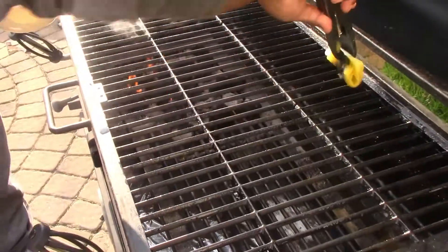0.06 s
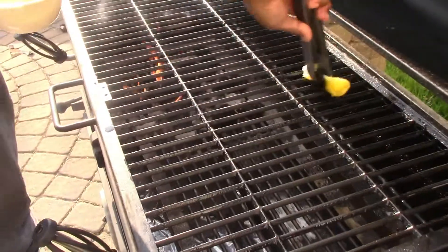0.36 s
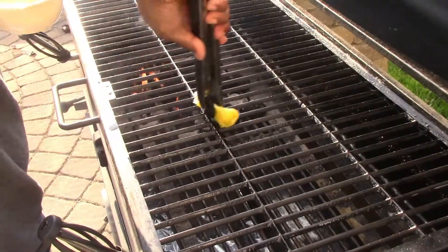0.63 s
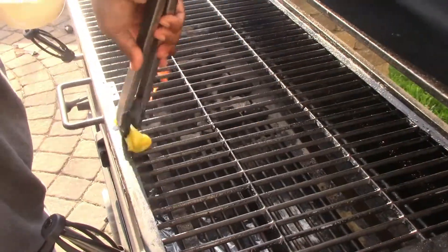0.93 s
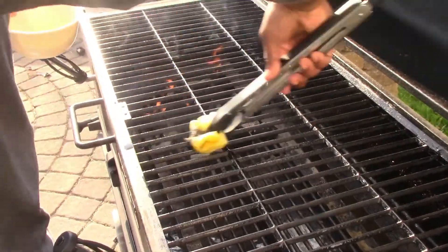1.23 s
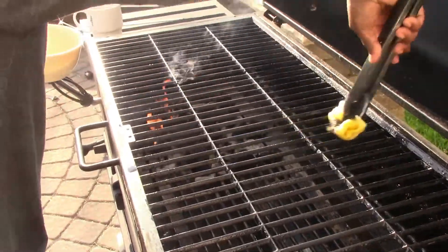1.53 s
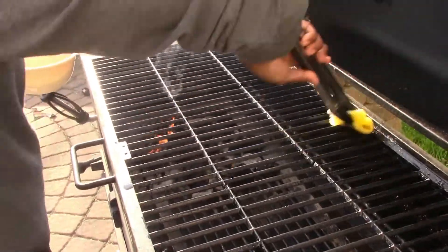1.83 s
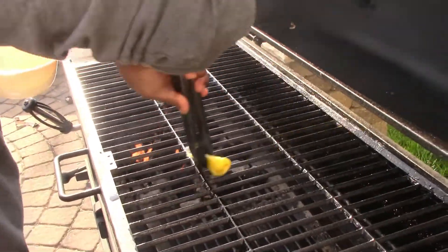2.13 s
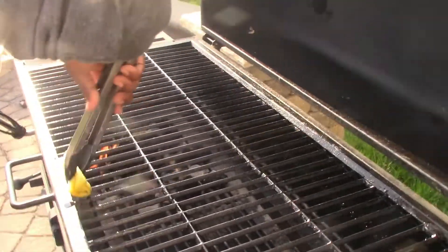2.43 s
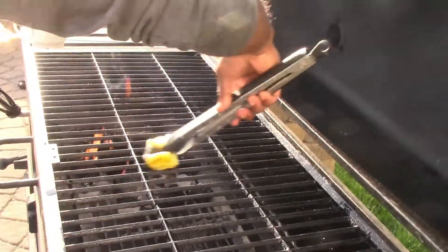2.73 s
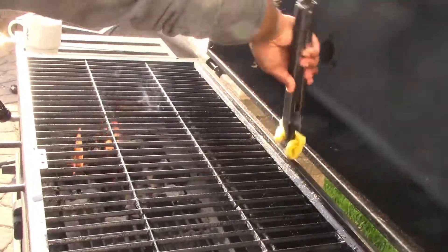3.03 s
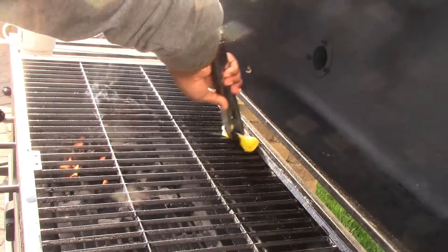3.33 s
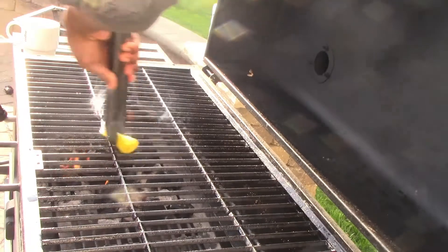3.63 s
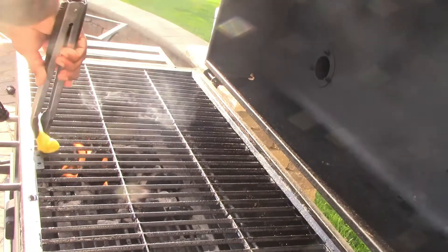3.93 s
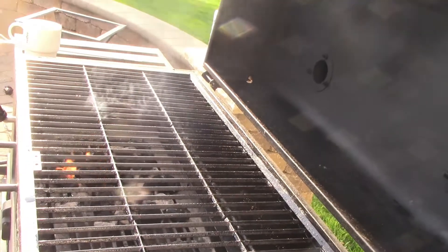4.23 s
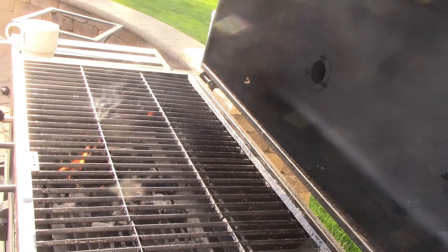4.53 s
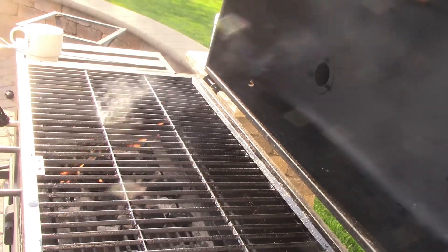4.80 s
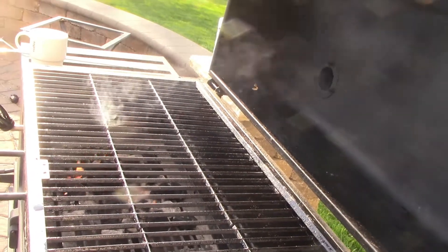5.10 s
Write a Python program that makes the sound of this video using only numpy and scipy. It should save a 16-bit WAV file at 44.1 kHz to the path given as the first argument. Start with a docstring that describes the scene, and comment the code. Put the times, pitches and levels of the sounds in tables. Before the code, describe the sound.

Outdoors, gas flames roar softly under a grill as metal tongs give a brief creak, then clack sharply and drag along the grate. The bars ring dully, and a paper towel rubs and sizzles back and forth on the hot steel. Low wind gusts buffet the microphone, strongest near the middle. After the last clack come two very faint steam whistles and a quiet, gritty shoe scuff.

```python
"""Steel tongs clack and scrape on the bars of a lit outdoor gas grill as they push a wad of paper towel.
Each hit makes the grate ring on dully. The towel hisses over the hot steel, the grip creaks,
and steam whistles faintly out of the fat. Behind it the flames roar softly and gusts of wind
buffet the microphone. At the end a shoe scuffs on the gritty paving."""
import sys
import numpy as np
from scipy import signal
from scipy.fft import rfft, irfft, next_fast_len
from scipy.io import wavfile

SR = 44100
rng = np.random.default_rng(int(sys.argv[2]) if len(sys.argv) > 2 else 0)


def unload_audio(sound):
    """Save the sound as a 16-bit wav file, at the path given as the first command line argument."""
    columns = np.transpose(np.atleast_2d(sound))
    # keep every value between -1 and 1, then stretch to whole-number steps
    steps = np.round(np.clip(columns, -1, 1) * 32767)
    wavfile.write(sys.argv[1], SR, steps.astype(np.int16))


N = 236318
RING_TIME = np.arange(32768) / SR  # seconds since a hit

# the tone of steel meeting steel: (frequency [Hz], level [dB])
CONTACT_TONE = [(100, -51), (600, 1), (1400, 5), (3400, -0.5), (4300, 6.5), (6000, 1), (8800, -6),
                (11800, -13), (14000, -30), (16000, -47)]


def amp(db):
    """Turns decibels into a gain."""
    return 10 ** (np.asarray(db) / 20)


def unit_rms(x):
    """Scales a sound to an average power of 1."""
    return x / np.sqrt(np.mean(x ** 2) + 1e-20)


def unit_energy(x):
    """Scales a sound to an energy of 1 per channel, however long it is."""
    return unit_rms(x) / np.sqrt(x.shape[-1])


def curve(points, hz):
    """Reads a curve through (frequency, value) points, spaced by octaves."""
    point_hz, value = np.transpose(points)
    return np.interp(np.log(hz + 1), np.log(point_hz + 1), value)


def bins(size):
    """The frequencies in the spectrum of a sound of this size."""
    return np.fft.rfftfreq(size, 1 / SR)


def add(mix, start, sound):
    """Mixes a sound in at a start time in seconds."""
    part = mix[:, max(round(start * SR), 0):][:, :sound.shape[-1]]
    part += sound[..., :part.shape[1]]


def colour(x, tone):
    """Shapes a sound with a (frequency [Hz], level [dB]) curve."""
    size = next_fast_len(x.shape[-1])
    return irfft(rfft(x, size) * amp(curve(tone, bins(size))), size)[..., :x.shape[-1]]


def tilted(x, slope_db, corner_hz=2500):
    """Brightens or dulls the treble by slope_db an octave."""
    size = next_fast_len(x.shape[-1] + 512)
    octaves = np.log2(1 + (bins(size) / corner_hz) ** 2) / 2
    return irfft(rfft(x, size) * amp(slope_db * octaves), size)[..., :x.shape[-1]]


def band(x, low_hz, high_hz):
    """Keeps what lies between two frequencies."""
    high_hz = min(high_hz, SR / 3)
    low_hz = min(low_hz, high_hz * .9)
    return signal.sosfilt(signal.butter(4, [low_hz, high_hz], "band", fs=SR, output="sos"), x)


def stereo_noise(size):
    """White noise that is nearly the same on the left and on the right."""
    # how alike the two sides are: (frequency [Hz], likeness [0 to 1])
    likeness = [(30, 1), (150, 1), (300, 0.99), (600, 0.98), (1200, 0.97), (2200, 0.96), (4000, 0.9),
                (16000, 1)]
    padded = next_fast_len(size)
    a, b = rfft(rng.standard_normal((2, padded)))
    same = np.clip(curve(likeness, bins(padded)), 0, 1)
    mid, side = a * np.sqrt((1 + same) / 2), b * np.sqrt((1 - same) / 2)
    return irfft(np.array([mid + side, mid - side]), padded)[:, :size]


def drift(rate_hz, size):
    """A value that wanders at random, turning rate_hz times a second."""
    points = rng.standard_normal(4096)
    return unit_rms(np.interp(np.arange(size) / SR * rate_hz, np.arange(len(points)), points))


def grains(size, per_s, spread_db):
    """Random clicks, a few of them large."""
    heights = amp(spread_db * np.minimum(rng.exponential(1, size), 4)) * rng.choice([-1, 1], size)
    return unit_rms(heights * (rng.random(size) < per_s / SR))


def swell(start, hold, rise_s, fall_s):
    """A gain that grows to 1 at start, holds and dies away."""
    t = np.arange(N) / SR - start
    return np.exp(np.minimum(t, 0) / rise_s - np.maximum(t - hold, 0) / fall_s)


def ringing(notes, t, scatter_db=0, stretch=1):
    """The fading notes of struck metal; scatter_db varies their levels, stretch makes them last longer."""
    chance = rng.standard_normal((len(notes), 2))
    sound = np.zeros(len(t))
    for (hz, db, ring_s), (luck, phase) in zip(notes, chance):
        fade = amp(db + scatter_db * luck - 60 * t / (ring_s * stretch))
        sound += fade * np.sin(2 * np.pi * hz * t + np.pi * phase)
    return unit_energy(sound)


def burner(level_db=-48):
    """The gas flames roar softly, with a slight flicker."""
    # the tone of the flames and the open air: (frequency [Hz], level [dB])
    flame_tone = [(20, -26), (70, -1.5), (170, 3), (300, 2), (550, -3), (900, -3), (1500, -11),
                  (2200, -15.5), (3500, -17.5), (6000, -24.5), (8000, -43), (11000, -63), (15500, -39)]
    flicker = amp(.5 * drift(25, N))
    return amp(level_db) * flicker * unit_rms(colour(stereo_noise(N), flame_tone))


def wind_strength(breeze_db=-57, shake_db=2, shake_hz=45.06):
    """Gusts add to a light breeze, and swirling air makes the level shake."""
    # gusts of wind: (time [s], hold [s], level [dB], fade time [s])
    gust_list = [(0.01, 0.025, -36.5, 0.036), (0.644, 0.028, -22.5, 0.057), (0.791, 0.0072, -26, 0.0081),
                 (0.854, 0.004, -29, 0.013), (0.923, 0.023, -38, 0.02), (1.14, 0.4, -40.5, 0.03),
                 (1.528, 0.08, -17.5, 0.1), (1.705, 0.024, -18, 0.027), (1.872, 0.006, -25.5, 0.014),
                 (1.961, 0.0054, -25, 0.016), (2.036, 0.017, -19, 0.047), (2.104, 0.01, -29, 0.12),
                 (4.258, 0.16, -43, 0.023)]
    gusts = [amp(db) * swell(start, hold, rise_s=0.024, fall_s=fade) for start, hold, db, fade in gust_list]
    power = amp(breeze_db) ** 2 + np.sum(np.square(gusts), 0)
    return np.sqrt(power) * amp(shake_db * drift(shake_hz, N))


def wind(lean_left_db=2.16, roar_db=-11, crossover=0.21):
    """Big swirls of air thump each side of the microphone separately; strong gusts add a higher roar."""
    # the tone of wind on the microphone: (frequency [Hz], level [dB])
    buffet_tone = [(20, -33), (50, -21.5), (90, -2), (140, 2), (210, 0), (320, -11), (480, -23),
                   (700, -35.5), (1200, -55), (3000, -67)]
    strength = wind_strength()
    big_swirls, small_swirls = colour(rng.standard_normal((2, 2, N)), buffet_tone)
    roar = unit_rms(band(small_swirls + crossover * small_swirls[::-1], 300, 2000))
    roar_share = np.clip((strength / amp(roar_db)) ** 0.85, 0, .8)  # grows as the wind nears roar_db
    rumble = unit_rms(big_swirls) * np.sqrt(1 - roar_share ** 2)
    return strength * (rumble + roar * roar_share) * amp([[lean_left_db], [-lean_left_db]])


def shoe_scuffs(spill_db=-15):
    """A sole grinds sand against the paving; some of the crunch spills over all pitches."""
    # slides of the shoe: (time [s], length [s], level [dB], low edge [Hz], high edge [Hz])
    slides = [(4.756, 0.11, -57, 4200, 10600), (4.775, 0.077, -43.5, 200, 3080),
              (4.827, 0.053, -52, 5100, 10200), (4.834, 0.072, -41, 475, 2760),
              (4.885, 0.21, -49, 665, 3300), (4.942, 0.25, -68, 4800, 10700), (5.04, 0.12, -45, 750, 3180),
              (5.28, 0.064, -53.5, 5450, 9500)]
    out = np.zeros((2, N))
    for start, length, db, low_hz, high_hz in slides:
        size = int(length * SR)
        grind = stereo_noise(SR // 2) + grains(SR // 2, per_s=700, spread_db=5.0)
        crunch = unit_rms(band(grind, low_hz, high_hz))
        crunch += amp(spill_db) * unit_rms(colour(grind, CONTACT_TONE))
        add(out, start, amp(db) * unit_rms(crunch[:, :size] * signal.windows.tukey(size, .7)))
    return out


def creaks(width=1.24, body_db=-10):
    """Dry surfaces stick and slip: each slip is a short tick with a duller body an octave below."""
    # ticks of the grip, later of grit under the shoe: (time [s], length [s], energy [dB], pitch [Hz])
    ticks = [(0.1856, 0.005, -6.5, 2170), (.29, 0.0024, -4, 2230), (0.293, 0.0028, 0, 2240),
             (.3015, 0.0013, -14, 2300), (0.306, 0.0014, -2, 2230), (0.312, 0.00089, -14, 2680),
             (4.786, 0.0023, -19, 1710), (4.872, 0.0023, -18, 6350), (4.987, 0.00099, -25.5, 7800),
             (5.002, 0.0028, -17, 1590), (5.056, 0.0014, -11, 2350), (5.057, 0.00065, -18.5, 5660),
             (5.097, .001, -17, 1890), (5.136, 0.0012, -17, 1770)]
    out, t = np.zeros((2, N)), RING_TIME[:2048]
    for start, length, db, hz in ticks:
        fade = np.exp(-(t / length) ** 4) + .1 * np.exp(-t / .011)
        burst = rng.standard_normal(len(t)) * fade
        tick = unit_energy(band(burst, hz / width, hz * width))
        body = unit_energy(band(burst, hz / 2 / width, hz / 2 * width))
        add(out, start, amp(db) * unit_energy(tick + amp(body_db) * body))
    return out


def fat_whistles(waver=.002):
    """Steam whistles out of a drop of fat through a tiny hole."""
    # thin whistles: (time [s], length [s], level [dB], pitch [Hz])
    whistles = [(3.82, 0.061, -63.5, 7000), (4.067, 0.086, -71, 7640)]
    out = np.zeros((2, N))
    for start, length, db, hz in whistles:
        size = int(length * SR)
        cycles = np.cumsum(hz * (1 + waver * drift(300, size))) / SR
        add(out, start, amp(db) * unit_rms(np.sin(2 * np.pi * cycles) * np.hanning(size)))
    return out


def firebox_bands():
    """The grate and the box under it ring with countless notes: gives each band's tone, rise and fall."""
    # bands of that blurred ring: (frequency [Hz], level [dB], time to fade 60 dB [s], rise time [s])
    ring_bands = [(65.5, -24, 1, 0.0098), (182, 0, 1, 0.011), (330, -4.5, 0.62, 0.0082),
                  (560, -4.5, 0.44, 0.0093), (950, -10.5, 0.28, 0.014), (1740, -14.5, 0.27, 0.0035),
                  (2680, -4, 0.072, 0.00033), (4840, -21, 0.15, 0.0019), (7740, -23.5, 0.11, 0.0021),
                  (13900, -51, 0.083, 0.0011)]
    hz, db, ring_s, rise_s = np.transpose(ring_bands)
    freqs = bins(len(RING_TIME))
    bass_cut = np.minimum(freqs / hz[0], 1)
    tone = amp(curve(np.c_[hz, db], freqs)) * bass_cut
    shares = np.array([curve(np.c_[hz, row], freqs) for row in np.eye(len(hz))])
    rise = 1 - np.exp(-RING_TIME / rise_s[:, None])
    fall_db = -60 * RING_TIME / ring_s[:, None]
    return shares * tone, rise, fall_db


def grate_ring(bands, stretch=1, notes_db=-2, rise_s=0.012):
    """Grate and box ring after one hit; a stretch below 1 cuts it short, as tongs resting on them do."""
    # the grate's clearest notes: (pitch [Hz], level [dB], time to fade 60 dB at stretch 1 [s])
    grate_notes = [(154.5, 4, 0.63), (197, -1, 1), (279.2, 4, 1), (310.3, -4.5, 1), (325.3, 4, 0.57),
                   (422, -18, 0.96), (455.3, 1.5, 0.51), (561, -24, 0.59), (634, -7, 0.34), (655, 0, 0.49),
                   (777, -2, 0.57), (963, -0.5, 0.29), (1064, -8.5, 0.51), (1190, -4, 0.33),
                   (2100, -3, 0.236), (2700, -2, 0.25)]
    tones, rise, fall_db = bands
    noise_bands = irfft(rfft(stereo_noise(len(RING_TIME)))[:, None] * tones)
    blur = (noise_bands * rise * amp(fall_db / stretch)).sum(1)
    notes = ringing(grate_notes, RING_TIME, scatter_db=4.5, stretch=stretch)
    notes *= 1 - np.exp(-RING_TIME / rise_s)
    return unit_energy(unit_energy(blur) + amp(notes_db) * notes)


def towel_pressure(press_s=0.12, lift_s=0.082, ease_db_per_s=3.5, sizzle_db=-55):
    """The hand presses the towel on, eases off and lifts it; the oiled bars sizzle on by themselves."""
    # strokes to and fro along the bars: (time [s], length [s], starting level [dB])
    strokes = [(0.22, 0.6, -42), (1.103, 0.39, -46), (1.77, 0.33, -42.5), (2.528, 0.27, -45.5),
               (3.245, 0.58, -46.5)]
    t = np.arange(N) / SR
    power = np.full(N, amp(sizzle_db) ** 2)
    for start, length, db in strokes:
        easing = amp(db - ease_db_per_s * np.clip(t - start, 0, length))
        power += (easing * swell(start, length, press_s, lift_s)) ** 2
    return np.sqrt(power)


def towel(bands, fibres_db=-5, flutter_db=2.2, hum_db=-2):
    """Paper fibres catch and sizzle on hot steel, and the rubbing keeps the grate humming."""
    # the tone of paper rubbing on steel: (frequency [Hz], level [dB])
    paper_tone = [(60, -15), (180, 24), (500, 0), (1000, 5), (2600, 1), (4200, -1), (8000, -3.5),
                  (11000, -10), (15500, -21)]
    rub = unit_rms(stereo_noise(N) + amp(fibres_db) * grains(N, per_s=1400, spread_db=2))
    pressure = towel_pressure() * amp(flutter_db * drift(60, N))
    hiss = pressure * unit_rms(colour(rub, paper_tone))
    shaking = pressure * rng.standard_normal(N)
    hum = signal.fftconvolve(shaking[None], grate_ring(bands), axes=1)[:, :N]
    return hiss + amp(hum_db) * hum


def tong_snap(crack_db=-2, arms_db=-6, chatter_db=-6, chatter_s=0.0049, lag_s=0.0006865):
    """Steel hits steel: one crack, a moment of chatter, and a brief ring from the arms of the tongs."""
    # the notes of the arms: (pitch [Hz], level [dB], time to fade 60 dB [s])
    arm_notes = [(673.6, 0.5, 0.17), (1353, 11, 0.038), (1435, 9, 0.081), (2002, 12, 0.04),
                 (2320, -11, 0.019), (2840, -11, 0.12), (3500, 6.5, 0.044), (4300, 15, 0.016),
                 (4480, -17, 0.0083), (5340, -30, .025), (6600, -51, 0.0087), (6450, -3.5, 0.022),
                 (6900, 8.5, 0.011), (8520, 13, 0.0067)]
    t = RING_TIME[:8192]
    log_gain = np.log(amp(curve(CONTACT_TONE, abs(np.fft.fftfreq(len(t), 1 / SR)))))
    # the spectrum of the most sudden click that has this tone
    click = np.exp(np.conj(signal.hilbert(log_gain)))[:len(t) // 2 + 1]
    # high pitches travel faster through steel: 1 kHz arrives lag_s late, the treble sooner
    delay = np.exp(-4j * np.pi * lag_s * np.sqrt(1000 * bins(len(t))))
    crack = unit_energy(irfft(click * delay))
    chatter = unit_energy(colour(stereo_noise(len(t)), CONTACT_TONE) * np.exp(-t / chatter_s))
    arms = ringing(arm_notes, t, scatter_db=2)
    return amp(crack_db) * crack + amp(arms_db) * arms + amp(chatter_db) * chatter


def tong_scrapes(bands, ring_db=3, rasp_db=-6, rasp_cycles=50):
    """A dragged tip sticks and slips: tiny hits shake tongs and grate, and one bar's note stands out."""
    # drags on the bars, the first being a brief knock just after the hit at 0.338 s: (time [s], length [s],
    # level [dB], treble tilt [dB per octave], rasp pitch [Hz])
    drags = [(0.341, 0.0031, -20.5, -34, 715), (.405, 0.043, -32.5, -11, 1390),
             (0.569, 0.033, -39.5, 0.5, 3230), (1.13, 0.044, -29, 0, 2130), (1.176, 0.07, -34, 2.5, 2060),
             (1.238, 0.033, -29.5, -3.5, 2670), (1.277, 0.091, -52, 10.5, 930),
             (1.834, 0.023, -32, -24, 630), (1.876, 0.014, -31.5, 2, 6200), (1.894, 0.079, -32.5, -11, 808),
             (2.531, 0.027, -25.5, -2, 2030), (2.555, 0.069, -34.5, 3.5, 800),
             (3.236, 0.036, -29.5, -4, 2870), (3.27, 0.11, -43, 0, 990), (3.389, 0.021, -37, 4, 1430)]
    out = np.zeros((2, N))
    for start, length, db, tilt_db, rasp_hz in drags:
        size = int(length * SR)
        slips = unit_rms(grains(SR, per_s=2500, spread_db=3.5)[:size] * signal.windows.tukey(size, .3))
        one_hit = amp(ring_db) * grate_ring(bands)
        one_hit += amp(rasp_db) * ringing([(rasp_hz, 0, rasp_cycles / rasp_hz)], RING_TIME)
        add(one_hit, 0, tong_snap(crack_db=-7, chatter_db=-10.5, chatter_s=0.014, lag_s=.002))
        one_hit = unit_energy(tilted(one_hit, tilt_db))
        add(out, start, amp(db) * signal.fftconvolve(slips[None], one_hit, axes=1))
    return out


def tong_clacks(bands, note_db=-5, note_width=1.124, ping_db=-6, ping_s=0.02):
    """The tips hit a bar or the rim; each spot has its own ping and brings out one note of the grate."""
    # hits of the tips: (time [s], snap energy [dB], treble tilt [dB per octave], ping pitch [Hz],
    # ring energy [dB], ring stretch [factor], note of the spot [Hz])
    hits = [(0.3378, 8.5, 1.5, 4380, 2, 1.04, 705), (0.543, -4.5, -4.5, 4270, 0.5, 1.36, 327),
            (1.0999, -8.5, 0, 4740, 2.5, 0.64, 202), (1.1634, -3, -5, 2110, 1.5, 0.95, 205),
            (1.2465, -6, -12, 2880, -1, 1.2, 283), (1.343, -7.5, -4, 4400, -1, 1, 312),
            (1.463, -26, 13, 8800, -20, .9, 200), (1.872, 7.5, 1.5, 1480, -3, 1.2, 766),
            (2.0576, 1, -2.5, 4330, -4.5, 0.71, 760), (2.5297, 1.5, -1.5, 2070, 7.5, 0.84, 330),
            (2.594, 2.5, -0.5, 2060, 4, 0.82, 767), (2.7444, 3.5, 3.5, 4040, -3, 0.92, 466),
            (2.746, 5, -0.5, 1490, 8, 0.89, 314), (2.904, -27, 8, 3480, -10.5, 1.8, 338),
            (3.1448, -24.5, 9, 4240, -15, 1.1, 201), (3.2341, -3, -11, 1330, 4.5, 0.56, 1000),
            (3.2439, 3, -9, 3000, 5.5, 0.99, 318), (3.3857, 6, 1.5, 1355, -1, 0.77, 321),
            (3.5446, -1, 0.5, 4360, 5, 1.14, 322)]
    out = np.zeros((2, N))
    for start, snap_db, tilt_db, ping_hz, ring_db, stretch, note_hz in hits:
        snap = tong_snap()
        ping = ringing([(ping_hz, 0, ping_s)], RING_TIME[:snap.shape[1]])
        ring = grate_ring(bands, stretch)
        note = unit_energy(band(ring, note_hz / note_width, note_hz * note_width))
        add(out, start, amp(snap_db) * unit_energy(tilted(snap + amp(ping_db) * ping, tilt_db)))
        add(out, start, amp(ring_db) * unit_energy(ring + amp(note_db) * note))
    return out


def scene():
    """Mixes the wiping of the grill with the sounds around it, in stereo."""
    bands = firebox_bands()
    grill = tong_clacks(bands) + tong_scrapes(bands) + towel(bands) + fat_whistles()
    return grill + creaks() + shoe_scuffs() + wind() + burner()


def record(dry, top_hz=15850):
    """Rounds off the loudest cracks, then cuts the very highest treble."""
    rounded = dry / (1 + abs(dry) ** 6) ** (1 / 6)
    low_pass = signal.firwin(255, top_hz, window=("kaiser", 9), fs=SR)
    return signal.oaconvolve(rounded, low_pass[None], "same")


dry = scene()
out = record(dry)
unload_audio(out)
```